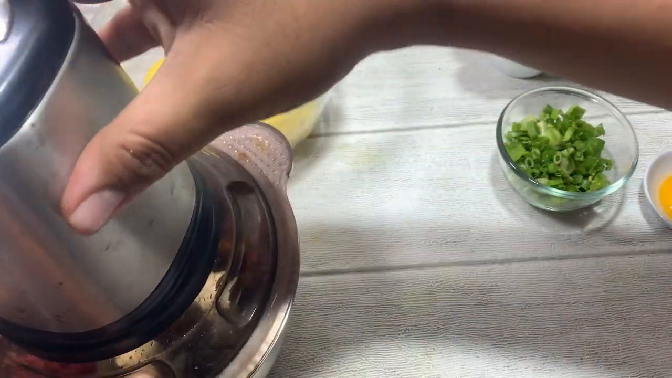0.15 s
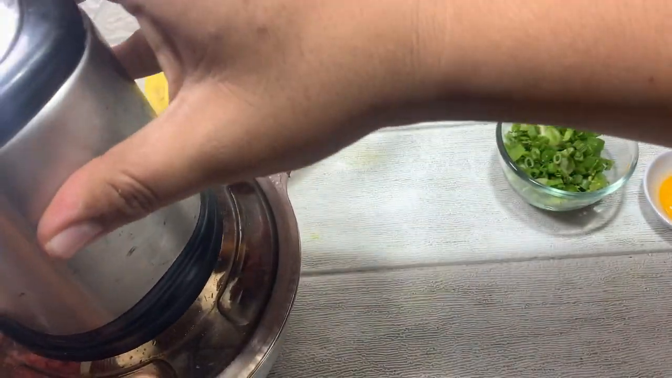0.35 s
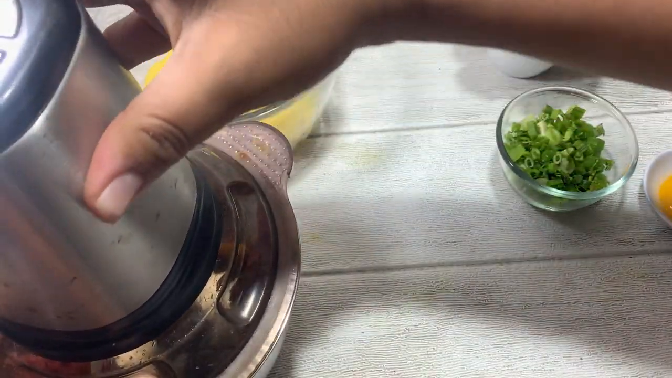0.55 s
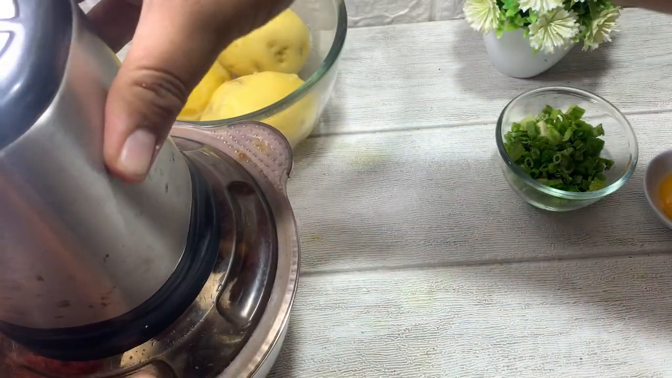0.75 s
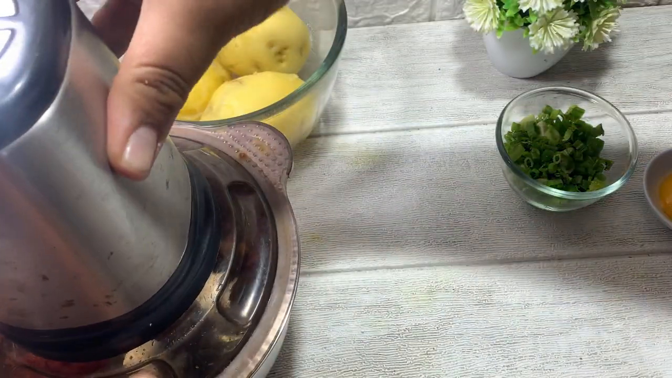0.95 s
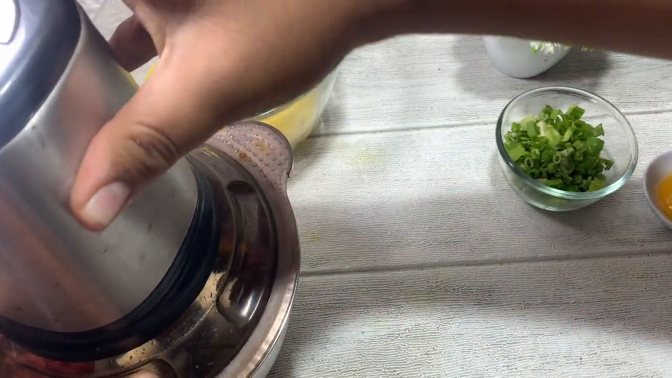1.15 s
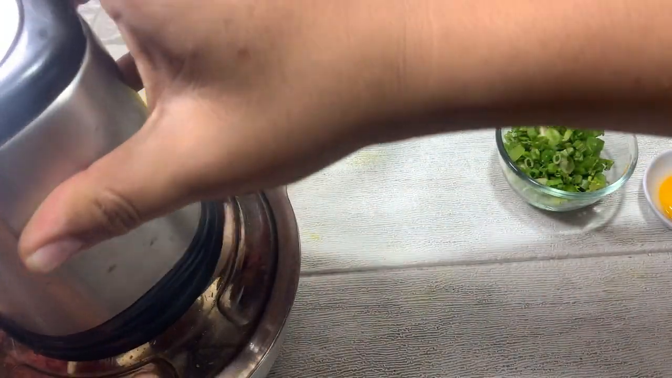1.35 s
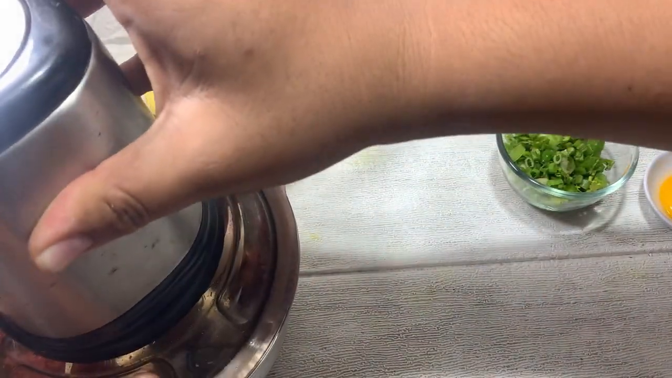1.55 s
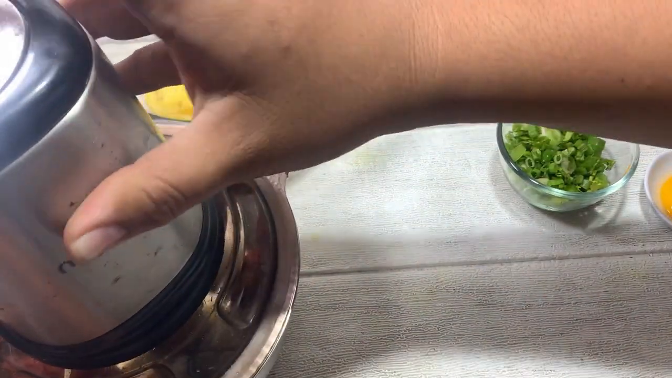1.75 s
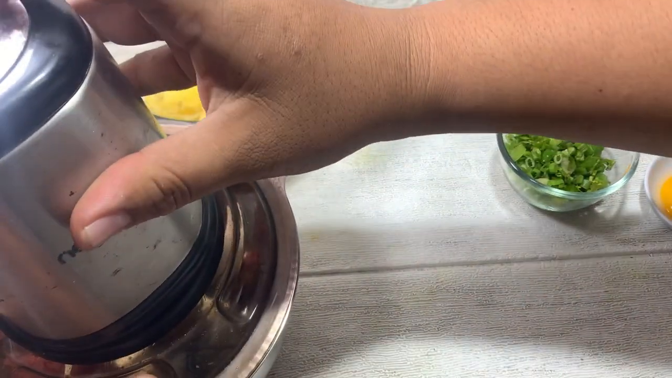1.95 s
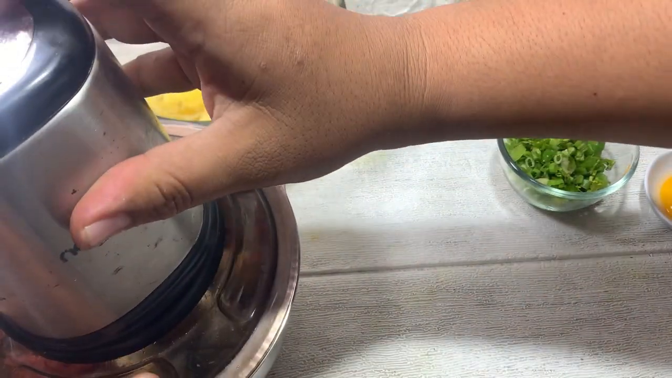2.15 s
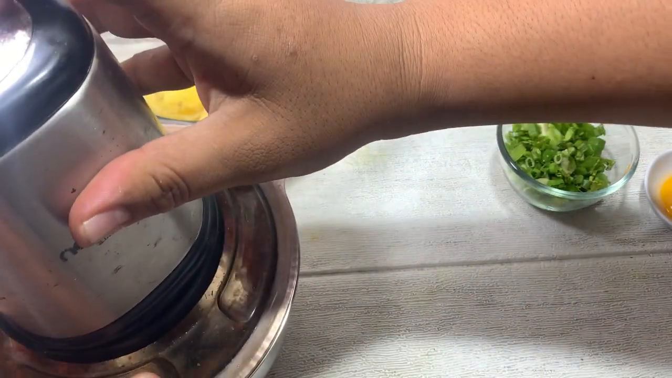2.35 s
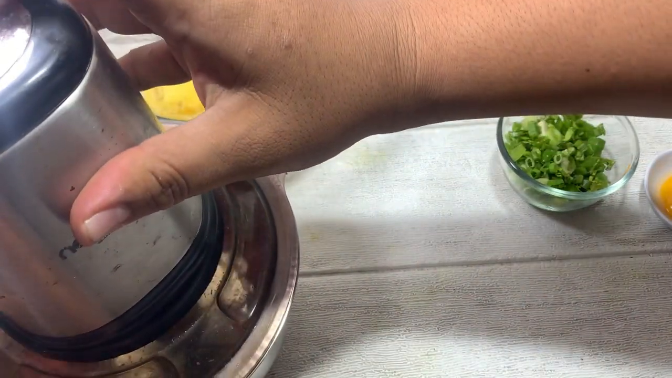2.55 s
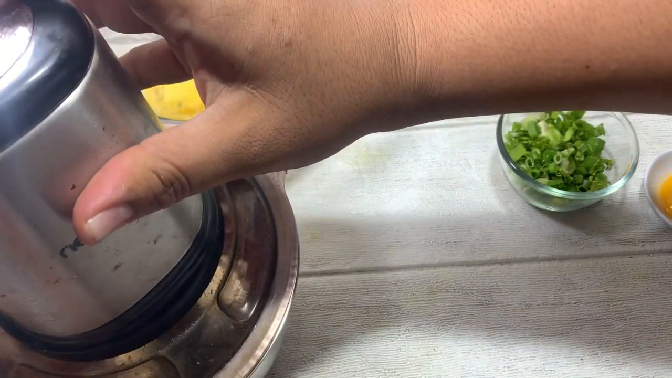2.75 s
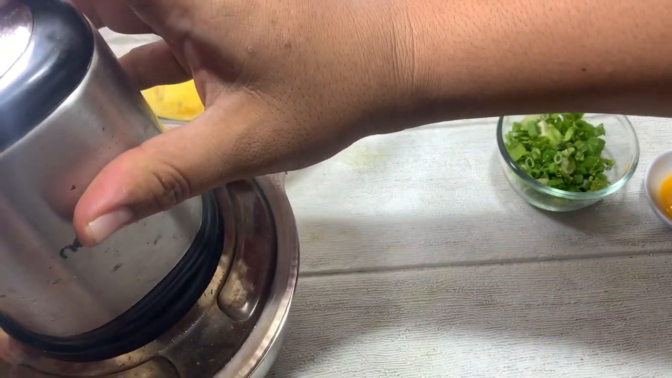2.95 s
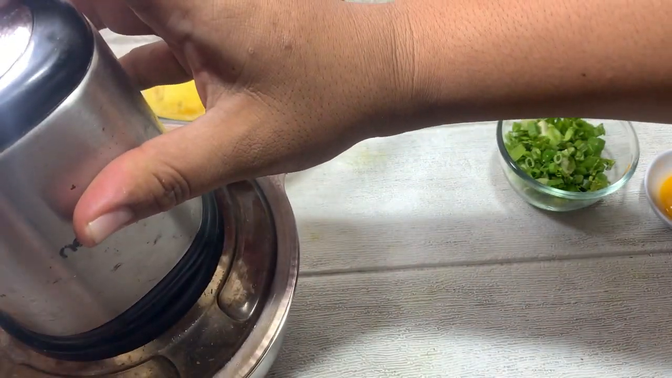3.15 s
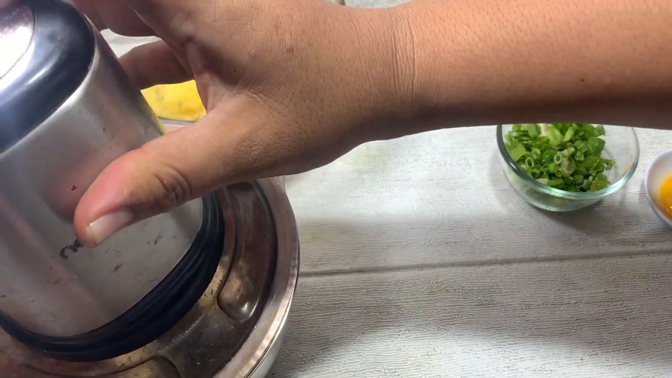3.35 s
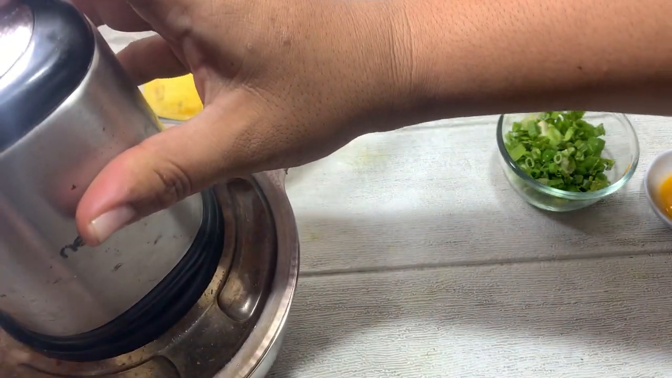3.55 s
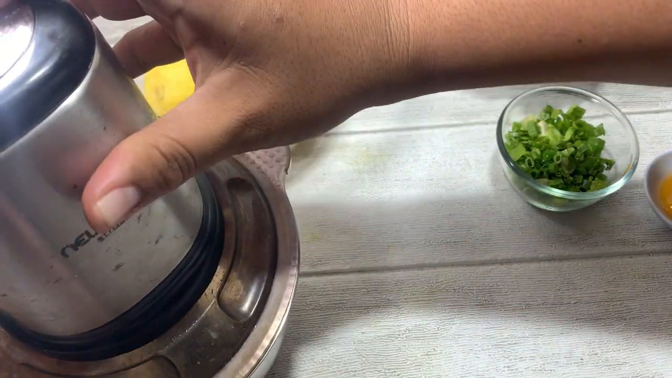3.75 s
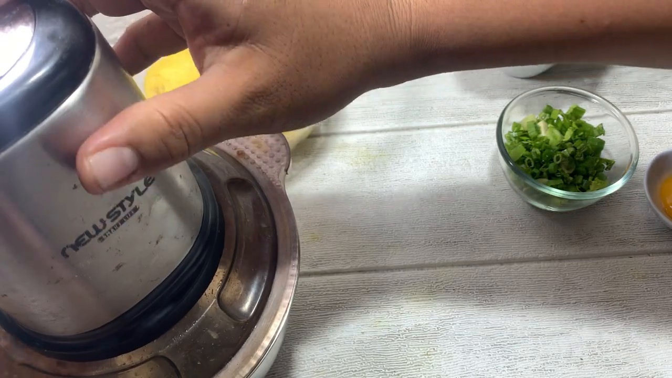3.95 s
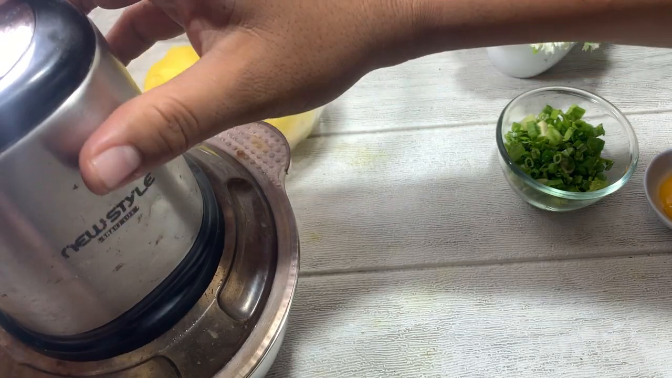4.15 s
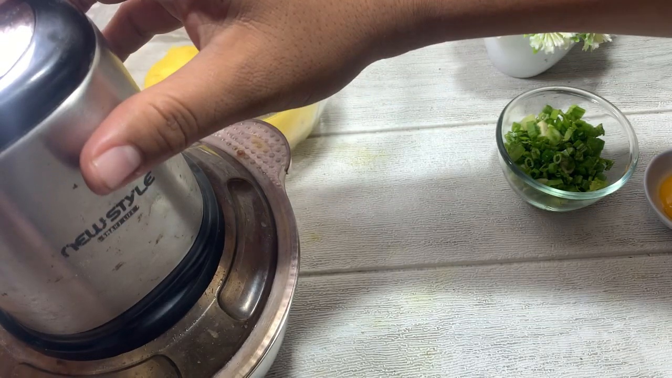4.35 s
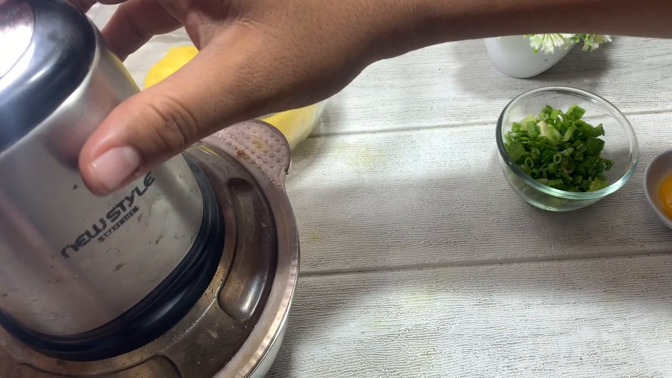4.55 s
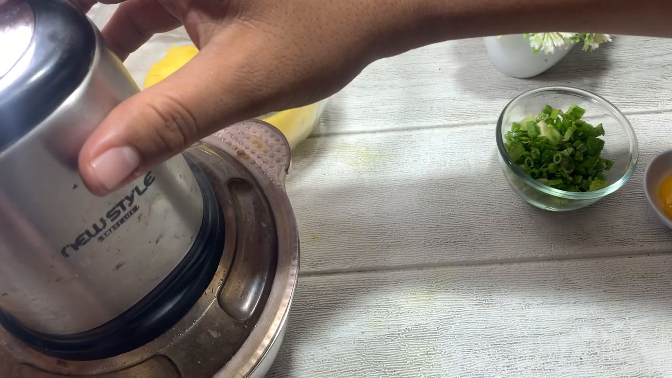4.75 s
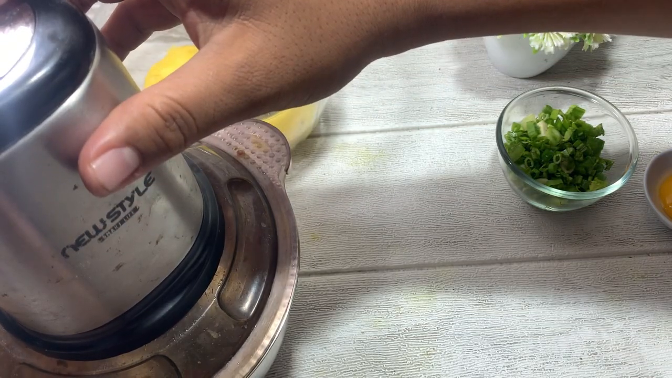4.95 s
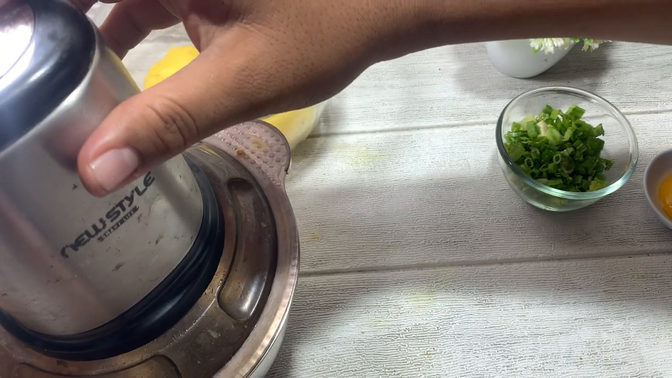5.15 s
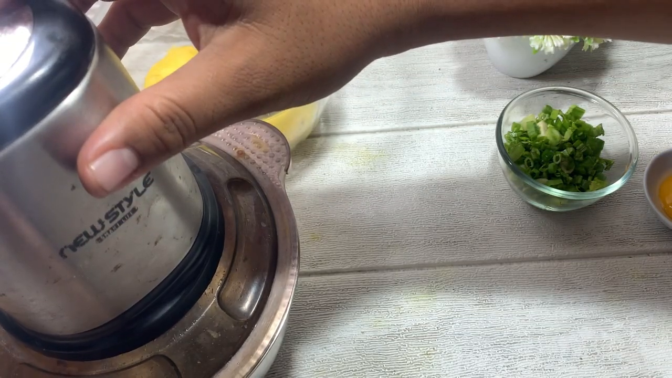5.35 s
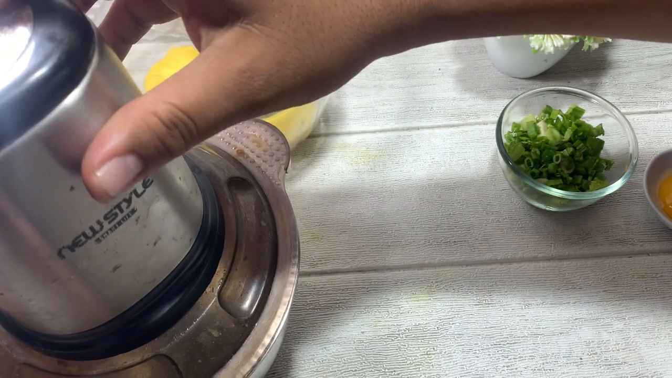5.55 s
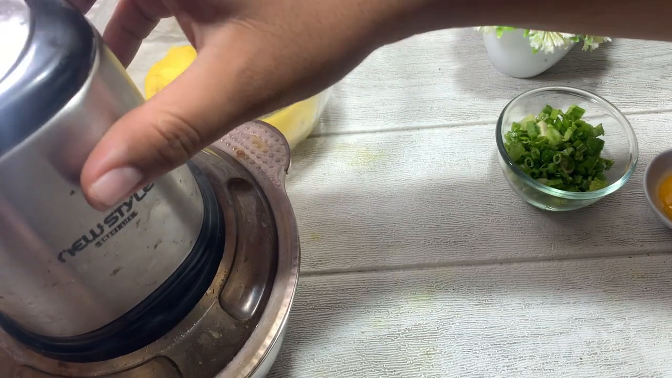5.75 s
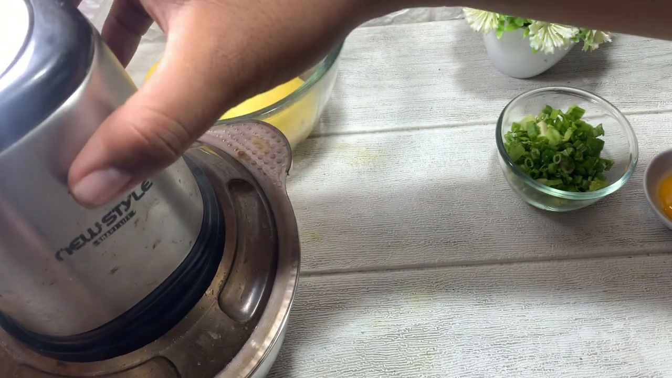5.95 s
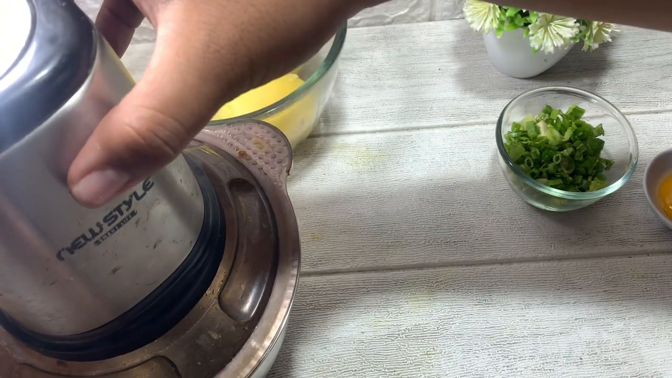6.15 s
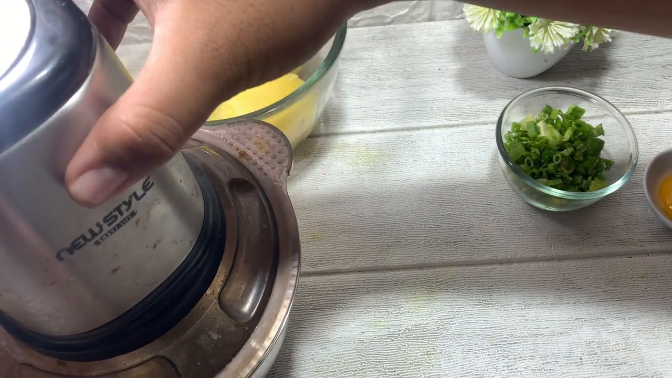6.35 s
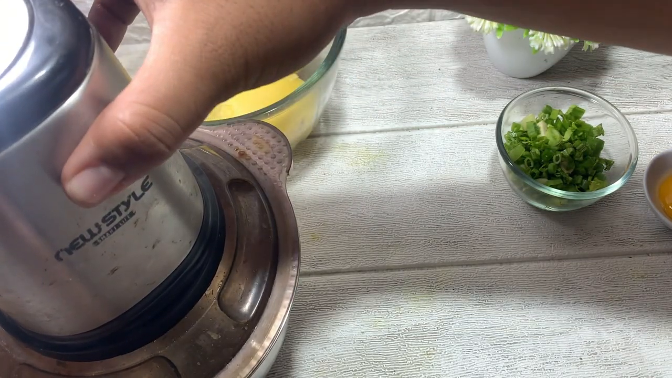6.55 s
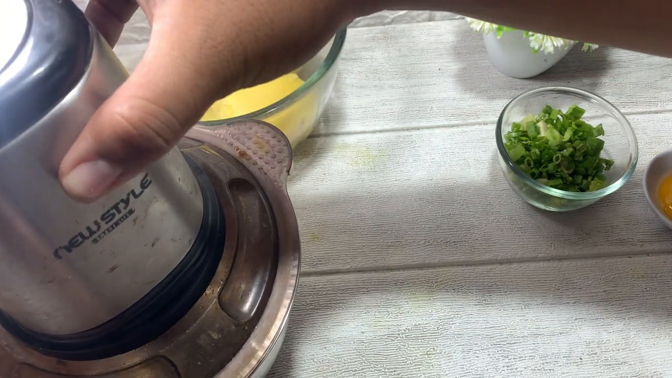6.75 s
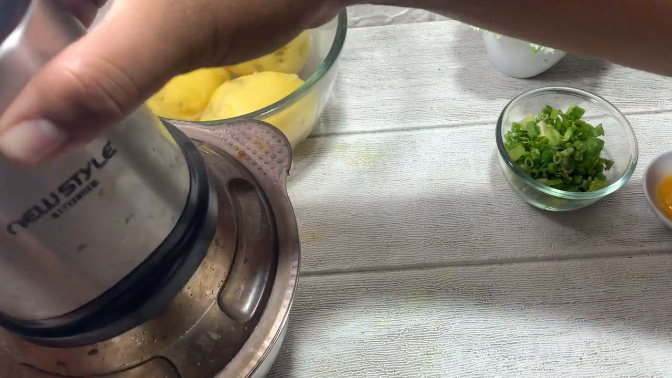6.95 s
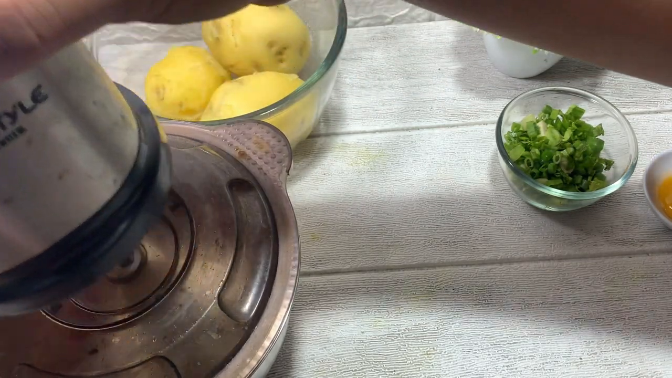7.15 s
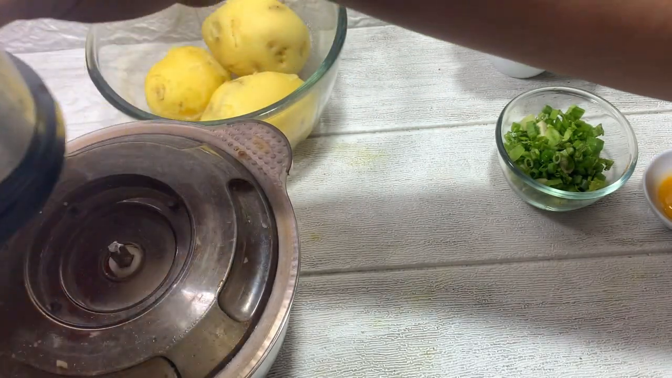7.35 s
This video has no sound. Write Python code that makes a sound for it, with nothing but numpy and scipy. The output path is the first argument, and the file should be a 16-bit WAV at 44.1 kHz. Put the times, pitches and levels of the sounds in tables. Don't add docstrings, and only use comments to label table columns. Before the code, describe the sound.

Soft handling knocks and a sharp clack, then an electric food chopper roars with clattering bits in steel, slowing to scattered ticks and silence.

```python
import sys
import numpy as np
from scipy import signal
from scipy.fft import rfft, irfft, next_fast_len
from scipy.io import wavfile
from scipy.ndimage import uniform_filter1d

SR = 44100
rng = np.random.default_rng(int(sys.argv[2]) if len(sys.argv) > 2 else 0)


def boost(x):
    u = np.asarray(x, float) / 20
    return 10 ** u


def transcribe(u):
    v = np.clip(np.atleast_2d(u).T, -1, 1)
    q = np.round(v * 32767).astype(np.int16)
    wavfile.write(sys.argv[1], SR, q)


N = 330309
T = np.arange(N) / SR

ON_S, OFF_S, REST_S = 2.18, 5.63, 7.03
DROP_S = 1.449
GEAR_RATIO, PINION_TEETH = 14.35, 17.38

# t/s, peak level/dB, level of the dull part/dB
SNAPS = [(2.197, -43.5, -16), (2.2163, -33, -19), (2.272, -14, -21), (2.2956, -29, -10), (2.33, -14, -14),
         (2.3792, -17.5, -20), (2.396, -16, -25), (2.413, -17, -19), (2.4855, -23, -16), (2.55, -35, -13),
         (2.5786, -17, -19), (2.6124, -17, -15), (2.6835, -17.5, -26), (2.7054, -15, -26),
         (2.765, -29, -18), (2.8019, -20, -16), (2.8508, -21.5, -15), (2.905, -18, -16), (2.928, -19, -23),
         (2.9526, -20, -16), (2.966, -12.5, -18), (3.048, -18, -23), (3.0713, -28.5, -18),
         (3.0817, -22, -14), (3.1023, -18, -17.5), (3.1352, -18, -10), (3.207, -17, -15),
         (3.2235, -16, -23), (3.2754, -20.5, -22), (3.297, -16.5, -21), (3.3587, -13, -24),
         (3.413, -14, -20), (3.413, -15, -17), (3.453, -21, -14), (3.5884, -11.5, -25), (3.676, -13, -17),
         (3.7967, -20.5, -21), (3.818, -15.5, -24), (3.882, -22, -11), (3.954, -25, -12.5),
         (4.0334, -9, -24), (4.0446, -8.5, -28), (4.0985, -22, -16), (4.1604, -18, -14), (4.1907, -11, -26),
         (4.2474, -11, -26), (4.3764, -26, -6), (4.515, -20, -10), (4.5505, -27, -8), (4.7051, -20, -15),
         (4.8024, -20.5, -13), (4.9635, -22, -12), (5.1182, -27, -7), (5.169, -26, -5), (5.232, -16, -18),
         (5.7732, -33, -11), (5.8156, -17, -26)]
# t/s, peak level/dB, f/Hz
CLICKS = [(.163, -42, 2300), (.163, -50, 3000), (.252, -48, 2700), (1.287, -46, 3200), (1.287, -48, 4600),
          (1.287, -48, 6800), (1.4075, -33, 3100), (1.4075, -35, 4300), (1.4075, -35, 5400),
          (1.4075, -31, 7700), (1.4075, -30, 10500), (1.4075, -38, 14500), (1.546, -52, 5600),
          (6.879, -58, 8200), (6.946, -50, 3150), (6.946, -58, 8300), (6.979, -54, 3600),
          (6.979, -53, 5400), (6.979, -56, 6800), (6.979, -49, 8200), (7.012, -57, 8300)]


def rms_one(x):
    return x / np.sqrt(np.mean(x ** 2) + 1e-20)


def in_time(rows, outside=None):
    s, *columns = np.transpose(rows)
    return [np.interp(T, s, c, left=outside, right=outside) for c in columns]


def drift(rate, shape=np.asarray):
    r = np.exp(-80 * np.pi * rate / SR)
    slow = signal.lfilter([1], [1, -2 * r, r * r], rng.standard_normal(N // 40 + 2002))[2000:]
    shaped = shape(rms_one(slow - slow.mean()))
    return np.interp(np.arange(N) / 40, np.arange(len(slow)), shaped)


def band(x, low_hz, high_hz):
    sos = signal.butter(3, [low_hz, high_hz], "band", fs=SR, output="sos")
    return signal.sosfilt(sos, x + 1e-18)


def resonance(x, hz, width):
    r = np.exp(-np.pi * width / SR)
    gain = (1 - r * r) / 2
    return signal.lfilter([gain, 0, -gain], [1, -2 * r * np.cos(2 * np.pi * hz / SR), r * r], x + 1e-18)


def colour(x, spectrum):
    hz, db = np.transpose(spectrum)
    grid = np.maximum(np.arange(4097) * SR / 8192, 1)
    cepstrum = irfft(np.log(boost(np.interp(np.log(grid), np.log(hz), db))))
    cepstrum[1:4096] *= 2
    cepstrum[4097:] = 0
    response = irfft(np.exp(rfft(cepstrum)))[None, :4096]
    return signal.oaconvolve(np.atleast_2d(x), response, axes=1)[:, :N].squeeze()


def tone(hz, wobble_db, rate):
    turns = np.cumsum(hz * np.ones(N)) / SR + rng.random()
    return np.sqrt(2) * np.sin(2 * np.pi * turns) * drift(rate, lambda slow: boost(wobble_db * slow))


def speed():
    run = np.clip(T - ON_S, 0, OFF_S - ON_S)
    coast = np.clip(T - OFF_S, 0, REST_S - OFF_S)
    driven = 466 - 155 * np.exp(-run / .165) - 161 * np.exp(-run / 3.9)
    return driven - 210 * coast - 30 * (1 - np.exp(-coast / .15))


def powered(db, gain_db, short_db, start_s, off_db, off_s, coast_db):
    run, coast = np.clip(T - ON_S, 0, OFF_S - ON_S), np.clip(T - OFF_S, 0, None)
    running_db = db + gain_db * run - short_db * np.exp(-run / start_s)
    return running_db - off_db * (1 - np.exp(-coast / off_s)) - coast_db * coast


def motor():
    # multiple of the tooth rate, level/dB
    gear_lines = [
        (.5, -8),
        (1, 0),
        (1.17, -12),
        (1.72, -12),
        (2.3, -12),
    ]
    # multiple of the blade speed, level/dB
    thrum_orders = [(2, -4), (3, -14.5), (4, -1.5), (5, 0.5), (6, 0), (7, -6), (8, 2.5), (9, -7),
                    (10, -5.5), (11, -2), (12, 3), (13, 1.5)]
    # t/s, f/Hz, level/dB
    shudder_curve = [(5.6, 218.8, -15), (5.66, 216, -16), (5.72, 205.8, -7.5), (5.78, 189.3, -8.5),
                     (5.85, 192.7, -9.5), (5.9, 196, -27), (5.97, 192, -64)]

    turns = speed()
    hum_db = powered(db=-14.5, gain_db=-2.5, short_db=40, start_s=0.11, off_db=32.5, off_s=0.3, coast_db=21)
    whine_db = powered(db=-38.5, gain_db=-0.8, short_db=17, start_s=1, off_db=30, off_s=0.5, coast_db=6)
    thrum_db = powered(db=-38.5, gain_db=4, short_db=26, start_s=0.05, off_db=12.5, off_s=1.06, coast_db=9)
    whine_db = whine_db + 16 * np.exp(-((PINION_TEETH * turns - 4300) / 600) ** 2) * (T < OFF_S)
    hum = boost(hum_db) * tone(turns, wobble_db=3.0, rate=15.0)

    sweep_db = 14 * np.exp(-np.clip(T - ON_S, 0, None) / .35)
    whine = 0
    for k, db in gear_lines:
        play = .35 + drift(130.0)
        line = tone(k * PINION_TEETH * turns, wobble_db=3.0, rate=1.2)
        whine = whine + boost(whine_db + db + (k < 1) * sweep_db) * play * line

    thrum = sum(boost(db) * tone(k * turns / GEAR_RATIO, wobble_db=3.0, rate=2.6) for k, db in thrum_orders)
    shake_hz, shake_db = in_time(shudder_curve)
    shudder = boost(shake_db) * tone(shake_hz, wobble_db=2.0, rate=50.0) * (T > 5.6) * (T < 5.97)
    turning = (T > ON_S) * (T < REST_S)
    return (hum + whine + boost(thrum_db) * thrum) * turning + shudder


def chopping():
    # f/Hz, level/dB per Hz
    bowl = [(30, -24.5), (60, -17.5), (130, -6.5), (330, -5), (580, -21.5), (950, -10), (1350, -13.5),
            (1750, -19), (2150, -34.5), (3100, -22), (3800, -33), (6500, -38), (9800, -33), (14000, -39)]
    # f/Hz, width/Hz, lift/dB
    lid_rings = [(2465, 44, 11.5), (502, 64, 4.5), (1013, 180, -2), (746, 49, -0.5), (573, 145, -29),
                 (3115, 160, 3.5), (3670, 1400, -35), (4510, 460, 5)]
    # t/s, level/dB
    load_curve = [(2.178, -41.5), (2.2, -7), (2.22, 3.5), (2.27, -0.5), (2.59, -1.5), (3.27, 0.5),
                  (4.3, -1), (4.78, 0), (5.2, -1.5), (5.55, 0), (5.85, 0), (6.3, 3.5), (6.6, 1), (6.94, 0),
                  (7.02, -14), (7.06, -33)]
    # level/dB, share of the load's swing, rise as food gets finer/dB per s, loss/dB per dB of speed lost
    chop_layers = [
        (-13.5, 0.83, -1.48, 1.9),
        (-19, 1.01, 0.8, 2.5),
        (-34, 1.26, 0.38, 3.5),
        (-34, 1.3, 0.04, 4),
        (-43, 0.97, 0.3, 2.5),
        (-39.5, 1.6, -0.93, 2.3),
    ]
    lulls = [2.271, 2.33, 2.396, 5.855, 6.228, 6.392, 6.553, 7.015]

    turns = speed()
    blade_turns = np.cumsum(turns / GEAR_RATIO) / SR
    load_db, = in_time(load_curve, outside=-120)
    slowed_db = 20 * np.log10(turns / turns.max()) * (T > OFF_S)
    run = np.clip(T - ON_S, 0, OFF_S - ON_S)
    levels = [db + swing * load_db + finer_db * run + loss * slowed_db
              for db, swing, finer_db, loss in chop_layers]
    levels[-1] += 11.5 * np.exp(-((turns - 287) / 21.4) ** 2)
    for k, wake_s in [(2, 0.071), (5, 0.142)]:
        levels[k] -= 9 * np.exp(-(np.clip(T - ON_S, 0, None) / wake_s) ** 2)
    lull_db = sum(9 * np.clip(1 + (T - s) / .016, 0, 1) ** .5 * (T < s) for s in lulls)

    coasting = 1 + 1.8 * np.clip(T - 5.8, 0, 1)
    pass_swing = 0.23 * np.cos(2 * np.pi * blade_turns) + 0.6 * np.cos(4 * np.pi * blade_turns)
    bunch_db = coasting * pass_swing + 1.42 * drift(61.5) + 1.24 * drift(21.0)

    lows, highs = [32, 560, 1950, 5200, 13400, 2330], [560, 1950, 5200, 13400, 16500, 2620]
    taps_per_s = [399.8, 1505.2, 2915, 9140, 4970, 407.0]
    bunch_shares = [1.13, 0.69, 0.62, 0.98, 1.1, 1.34]
    scatters = [0.3, 0.44, 0.88, 1.7, 1.3, 0.98]
    out = 0
    for low, high, level_db, per_s, share, scatter in zip(lows, highs, levels, taps_per_s,
                                                          bunch_shares, scatters):
        taps = 1.0 * (rng.random(N) < per_s / SR)
        sizes = boost(2.0 * np.minimum(rng.exponential(1, N // 4), 4)) * rng.choice([-1, 1], N // 4)
        taps[taps > 0] = sizes[:round(taps.sum())]
        strikes = rms_one(taps) + 0.6 * rng.standard_normal(N) + scatter * rng.standard_normal((2, N))
        body = colour(strikes, bowl)
        body = body + sum((boost(db) - 1) * resonance(body, hz, width)
                          for hz, width, db in lid_rings if low < hz < high)
        gain = boost(level_db + share * bunch_db - lull_db * (low > 500))
        out = out + gain * rms_one(band(body, low, high))
    return out


def snaps():
    bright, dull = np.zeros((2, N + 900))
    t = np.arange(900)
    fade = boost(-60 * t / SR / 0.011) * np.minimum(t / 30, 1)
    fade_s = 2.2
    luck = rng.random((200, 2))
    spent = np.cumsum(luck[:, 0] + 0.13) / 0.42 / 40 / fade_s
    last = 1 - np.exp((ON_S - OFF_S) / fade_s)
    crumbs = [(ON_S - fade_s * np.log(1 - x), -33 + 9.0 * y, -15)
              for x, y in zip(spent, luck[:, 1]) if x < last]
    grits = rng.standard_normal((len(SNAPS) + 200, 900))
    for (s, db, dull_db), grit in zip(SNAPS + crumbs, grits):
        at = round(s * SR)
        bright[at:at + 900] += boost(db + 14.5) * grit * fade
        dull[at:at + 900] += boost(db + dull_db + 7.0) * grit * fade
    bright, dull = bright[:N], dull[:N]
    out = resonance(bright, 9790, 1160) + band(dull, 5100, 7500)
    out += 0.12 * band(bright, 11000, 11300)
    out += .05 * band(bright, 7800, 8800)
    out += .07 * band(bright, 12300, 15800)
    return out


def knocks(events, boost_db):
    # f/Hz, level/dB per Hz
    knock_spectrum = [(40, -27), (100, 0.5), (200, -0.5), (330, -3), (550, -13), (780, -3.5), (1050, -6.5),
                      (1350, -5.5), (1800, -18), (2200, -43.5), (4000, -50), (7000, -56), (10000, -38),
                      (14000, -41)]

    dull, edge, rings = np.zeros((3, N + 6000))
    t = np.arange(6000) / SR
    for (s, db, hz, bright_db, t60), grit in zip(events, rng.standard_normal((len(events), 6000))):
        at = round(s * SR)
        fade = boost(db + boost_db - 60 * t / np.clip(t60, .01, .3)) * np.minimum(t / 0.0024, 1)
        dull[at:at + 6000] += grit * fade
        edge[at:at + 6000] += grit * fade * boost(bright_db - 60 * t / (2.0 * t60))
        rings[at:at + 6000] += .6 * np.sin(2 * np.pi * hz * t) * fade * np.minimum(t / .002, 1)
    edge = edge[:N]
    out = 4.55 * colour(dull[:N], knock_spectrum) + rings[:N]
    out += 0.23 * band(edge, 2000, 3460)
    out += 0.031 * band(edge, 2900, 4800)
    out += 0.026 * band(edge, 4900, 12800)
    return out


def impacts():
    # t/s, peak level/dB, ring f/Hz, brightness/dB,
    # t60/s
    head_knocks = [(0.163, -22.5, 450, 5.5, 0.034), (0.251, -28.5, 1010, 0, 0.038),
                   (0.365, -49, 350, -5, 0.04), (0.408, -27, 1310, -8, 0.025), (0.588, -44, 484, 0, 0.047),
                   (0.755, -39, 1030, -2, 0.046), (0.829, -43, 800, -2.5, 0.042),
                   (1.1, -38.5, 1556, 9.5, 0.057), (1.182, -44.5, 1030, 5, 0.075),
                   (1.286, -26.5, 1250, 13.5, 0.038), (1.407, -6, 1380, 7, 0.014),
                   (1.419, -10.5, 1120, -17, 0.024), (1.441, -25, 918, -8, 0.028),
                   (1.79, -33.5, 540, -15, 0.03),
                   (1.391, -22.5, 696, 4, 0.045),
        (1.398, -13.5, 450, 10.5, 0.076),
        (1.403, -17, 970, 7, 0.021),
        (1.547, -37.5, 1074, 17, 0.39),
        (6.948, -44, 1500, 4, 0.027),
        (7.13, -27.5, 1080, -14, 0.039),
        (7.137, -23, 946, -15, 0.023),
    ]
    # t/s, peak level/dB, ring f/Hz
    blows = [(2.192, -7.5, 896), (2.271, -1, 1290), (2.33, -7, 950), (2.396, -4.5, 890), (2.614, -15, 931),
             (3.234, -10.5, 1330), (3.296, -0.5, 1310)]
    # t/s, peak level/dB, ring f/Hz
    rattles = [(5.755, -12, 991), (6.184, -19, 960), (6.374, -21, 851), (6.449, -26, 1020),
               (6.485, -20, 1020), (6.603, -31, 1580), (5.788, -13, 1270), (5.854, -10.5, 1200),
               (5.93, -23, 1230), (6.035, -12, 1040), (6.116, -12, 910), (6.227, -8.5, 990),
               (6.293, -22, 930), (6.334, -18.5, 1290), (6.392, -13.5, 945), (6.511, -26, 1345),
               (6.553, -15.5, 936), (6.63, -25, 960), (6.709, -31, 1490), (6.763, -40, 1030),
               (6.807, -27, 1470), (6.864, -29, 900), (6.908, -27, 1100), (6.946, -21, 890),
               (6.98, -25, 1214), (7.016, -29.5, 1160), (7.073, -48, 452), (7.124, -26, 937),
               (7.168, -31.5, 1110), (7.215, -36, 510), (7.283, -50, 1000), (7.307, -42, 1472),
               (7.357, -45, 474), (7.417, -60, 510), (7.442, -42, 915)]

    thrown = [(s, db - 2.0, hz, -4, 0.029) for s, db, hz in blows]
    rattling = [(s, db - 1.5, hz, -6, 0.041) for s, db, hz in rattles]
    return knocks(head_knocks + thrown + rattling, boost_db=4.5)


def catches():
    # t/s, length/s, f/Hz, level/dB
    clunks = [
        (1.407, 0.0062, 1360, -2.5),
        (1.4096, 0.022, 196, -10),
        (1.285, 0.015, 1235, -26.5),
        (2.22, 0.033, 161, -8),
        (2.236, 0.091, 70, -18.5),
        (2.295, .025, 131, -15),
    ]
    # t/s, peak level/dB
    ring_taps = [(5.826, -29), (5.86, -23.5), (5.8933, -25), (5.9257, -21), (6.0193, -36), (6.0403, -39),
                 (6.0743, -36), (6.107, -34), (6.1276, -40), (6.199, -30), (6.252, -33), (6.3067, -41),
                 (6.334, -31), (6.391, -28), (6.4558, -46), (6.4836, -30), (6.507, -36), (6.5797, -35),
                 (6.604, -44), (6.67, -43), (6.6878, -45), (6.7292, -57), (6.7567, -51), (6.813, -40),
                 (6.8584, -59), (6.9083, -72)]

    out = 0
    for s, length, hz, db in clunks:
        swell = np.sin(np.pi * np.clip((T - s) / length, 0, 1)) ** 2
        out = out + boost(db) * swell * np.sin(2 * np.pi * hz * (T - s))
    for s, db in ring_taps:
        t = np.clip(T - s, 0, 1)
        hz = 2497 * rng.uniform(0.94, 1.01)
        out = out + boost(db - 60 * t / 0.062) * np.minimum(t / 0.0044, 1) * np.sin(2 * np.pi * hz * t)
    return out


def clicks():
    out = 0
    for s, db, hz in CLICKS:
        t = np.clip(T - s, 0, 1)
        out = out + boost(db - 60 * t / .008) * np.sin(2 * np.pi * hz * t)
    return out * np.array([[1.6], [.4]])


def handling():
    # f/Hz, level/dB per Hz
    kitchen = [(25, 1), (60, -4.5), (110, 2), (250, -13.5), (500, -8.5), (1200, -3.5), (1800, -22),
               (2500, -36), (5000, -38.5), (8000, -24.5), (10500, -55), (13500, -37), (15000, -33)]
    # t/s, level/dB
    hand_curve = [(0.0, -39.5), (0.31, -33), (0.62, -31.5), (0.86, -42.5), (1.07, -42), (1.36, -33),
                  (1.82, -40), (2.17, -37.5), (7.0, -33.5), (7.122, -42), (7.342, -45), (7.49, -42)]
    hand_layers = [
        (-37.5, 1, -23.5, 104),
        (-51, 0.46, -34, 82),
        (-64.5, 0.55, -71, 69.5),
    ]
    # t/s, length/s, f/Hz, level/dB
    rubs = [(0.01, 0.24, 272, -53), (.385, .13, 368, -37), (0.788, 0.063, 813, -51),
            (1.433, 0.17, 379, -39), (7.072, 0.066, 428, -54), (7.326, 0.18, 343, -53)]
    buzzes = [(5.31, 0.28, 170, -20.5), (4.7, 0.21, 260, -31), (5.3, 0.32, 450, -32),
              (5.33, 0.26, 505, -33), (4.85, 0.24, 108, -22), (6.45, 0.5, 520, -51)]

    noise = colour(rng.standard_normal(N) + 0.23 * rng.standard_normal((2, N)), kitchen)
    noise = noise * boost(2.47 * drift(24.0))
    noise = noise + 5.0 * resonance(noise, 2880, 350)
    noise = noise + 0.32 * resonance(noise, 740, 77)
    hand_db, = in_time(hand_curve)
    drop_rise = np.clip(1 + (T - DROP_S) / 0.099, 0, 1)
    out = 0
    for low, high, layer in zip([35, 330, 1750], [330, 1750, 5000], hand_layers):
        db, swing, drop_db, dying_db = layer
        pressure = boost(db + swing * (hand_db + 36))
        drop = boost(drop_db - dying_db * np.abs(T - DROP_S)) * drop_rise
        out = out + (pressure + drop) * rms_one(band(noise, low, high))

    waver = 1 + 0.009 * drift(11.3)
    for s, length, hz, db in rubs + buzzes:
        corners = [s - .2, s, s + length, s + length + .5]
        rub_db = np.interp(T, corners, [db - .2 * 299, db, db, db - .5 * 108], -200, -200)
        out = out + boost(rub_db) * tone(hz * waver, wobble_db=3.0, rate=21.0)
    return out


def electronics():
    # f/Hz, width/Hz, level/dB
    whistle_lines = [
        (15625, 2, -59),
        (11580, 40, -64),
        (11280, 150, -63),
        (10100, 200, -68),
    ]

    hiss = rng.standard_normal(N) + .5 * rng.standard_normal((2, N))
    hiss = boost(-63) * rms_one(band(hiss, 7800, 12400))
    hiss = hiss + boost(-74.5) * rms_one(band(rng.standard_normal((2, N)), 3000, 9500))

    whistles = 0
    for hz, width, db in whistle_lines[1:]:
        narrow = resonance(resonance(rng.standard_normal(N), hz, width), hz, width)
        whistles = whistles + boost(db) * rms_one(narrow)
    hz, _, db = whistle_lines[0]
    coasting = np.where((T > OFF_S) & (T < REST_S + .08), .25, 1)
    waiting = np.where((T > DROP_S) & (T < ON_S), .55, 1)
    whistles += boost(db) * tone(hz, wobble_db=1.5, rate=2.0) * coasting * waiting

    tick_db = -26
    slots = np.arange(.0042, N / SR - .01, .5 / 29.987)
    luck = rng.random((len(slots), 3))
    impulses = np.zeros(N)
    sounds = (np.arange(len(slots)) % 2 == 0) | (luck[:, 0] < .3)
    at = (slots * SR).astype(int)
    impulses[at] = sounds * boost(tick_db - 3.0 * luck[:, 1])
    impulses[at + 60] = sounds * boost(tick_db - 3.0 * luck[:, 2])
    impulses[at + 270] = (luck[:, 0] > .88) * boost(tick_db - 4.5)
    return hiss + whistles + 1.77 * band(band(impulses, 8800, 12400), 8500, 12600)


def scene():
    near = motor() + chopping() + snaps() + catches() + handling() + impacts()
    t = np.arange(SR // 4) / SR
    tails = band(rng.standard_normal((2, len(t))), 587.0, 4700) * boost(-60 * t / .15) * (t > .002)
    tails /= np.sqrt(np.sum(tails ** 2, axis=1, keepdims=True))
    walls = boost(-16) * signal.oaconvolve(near, tails, axes=1)[:, :N]
    return near + clicks() + electronics() + walls


def gate_weak_bands(spectrum, column, size):
    gated_bands = [(2700, 2860, -30, 0, .3, .1), (3050, 3400, -30, 0, .04, .55),
                   (3420, 3680, -30, -6, .35, .2), (3680, 3950, -30, -6, .4, .1),
                   (3600, 4800, 0, -16, 1, 1), (4950, 5250, -35, 0, .75, .7), (5250, 5700, -35, 0, .88, .8),
                   (7400, 7800, -30, 0, .1, .2), (7900, 8200, -30, 0, .1, .1),
                   (8450, 8900, -30, 0, .15, .3), (12600, 12950, -30, 0, .45, .1),
                   (12950, 13400, -35, 0, .75, .5), (13400, 13900, -35, 0, .9, 1),
                   (13900, 15200, -30, 0, 0, 1)]

    frame, held = 1024, 2
    hz = np.arange(len(spectrum)) * SR / size
    out = irfft(spectrum, size)[:N]
    running = (T > ON_S) & (T < REST_S - .42)
    attacks = [s for s, db, _ in SNAPS if db > -18] + [s for s, _, _ in CLICKS]
    calm = ~np.any([np.abs(T - s) < .012 for s in set(attacks)], axis=0)
    for low, high, *cuts_db, running_share, rest_share in gated_bands:
        if cuts_db[column]:
            luck = np.repeat(rng.random(N // frame), held * frame)
            luck = luck[rng.integers(held) * frame:][:N]
            dropped = luck < np.where(running, running_share, rest_share)
            part = irfft(spectrum * (hz > low) * (hz < high), size)[:N]
            gate = uniform_filter1d(1.0 * (dropped & calm), size=400)
            out -= (1 - boost(cuts_db[column])) * gate * part
    return out


def band_limit(x):
    return signal.sosfilt(signal.butter(12, 16730, fs=SR, output="sos"), x)


def record(dry):
    # f/Hz, phase of left ahead of right/rad; flat stretches leave almost only mid (12.57) or only side (15.7)
    left_lead = [(0, -1.2), (312, 3.14), (750, 9.4), (1300, 18.6), (2400, 17.9), (2700, 15.7), (3400, 15.4),
                 (3650, 12.57), (4800, 12.57), (4900, 15.7), (5600, 15.7), (7000, 20), (7300, 17.3),
                 (15500, 6.3)]

    size = next_fast_len(N + 4096)
    hz = np.arange(size // 2 + 1) * SR / size
    lead = np.interp(hz, *np.transpose(left_lead))
    top_cut = boost(-60 * np.clip((hz - 15850) / 500, 0, 1) ** .5)
    bass_cut = hz ** 4 / (hz ** 4 + 43 ** 4)
    delay = np.exp(-1j * lead * np.array([[0], [1]]))
    left, right = rfft(dry, size) * top_cut * bass_cut * delay
    mid = gate_weak_bands((left + right) / 2, column=0, size=size)
    side = gate_weak_bands((left - right) / 2, column=1, size=size)
    ports = np.array([mid + side, mid - side])
    rounded = np.clip(1.4 * np.tanh(ports / 1.4), -1, 1)
    low_pass = signal.ellip(10, .2, 60, 16150, fs=SR, output="sos")
    mix = signal.sosfilt(low_pass, rounded)
    return band_limit(mix)


dry = scene()
out = record(dry)
transcribe(out)
```